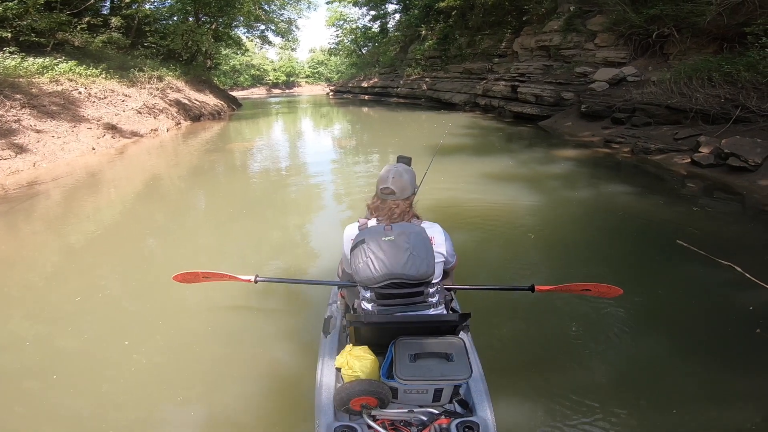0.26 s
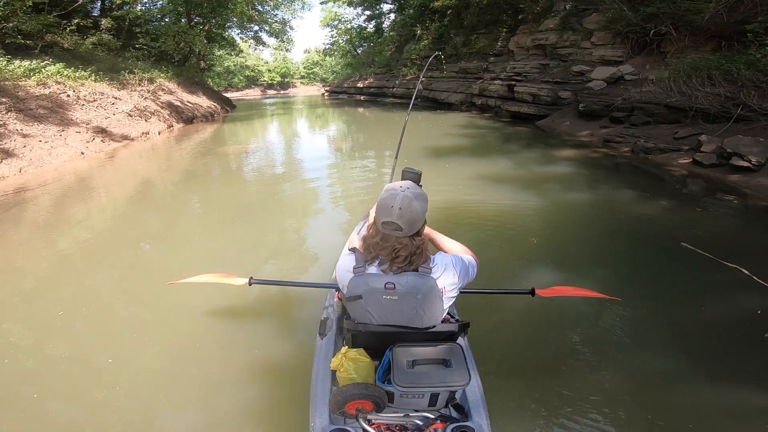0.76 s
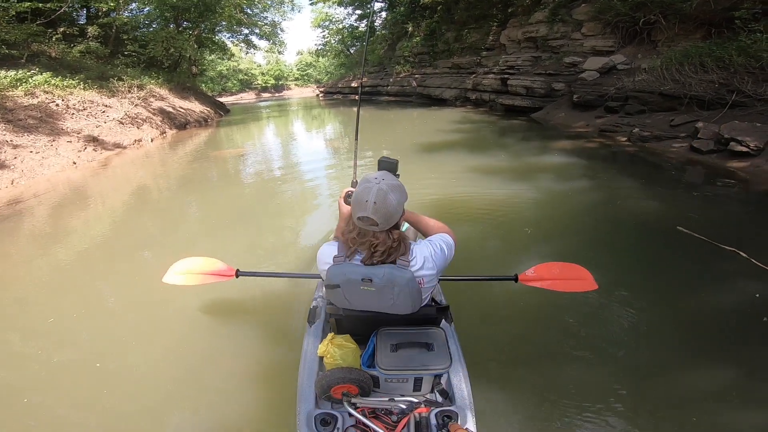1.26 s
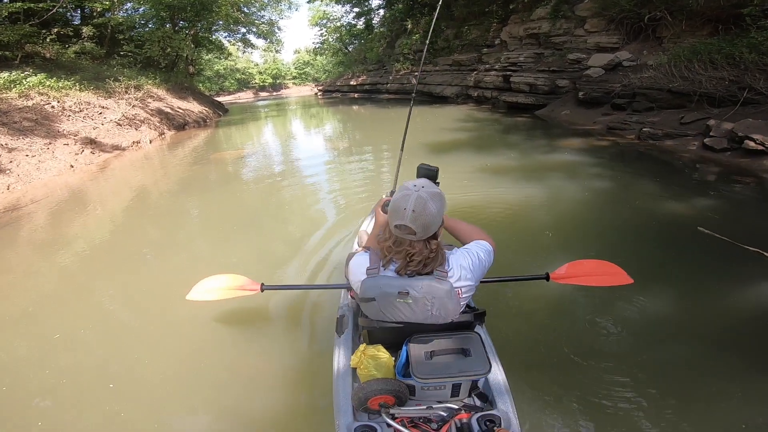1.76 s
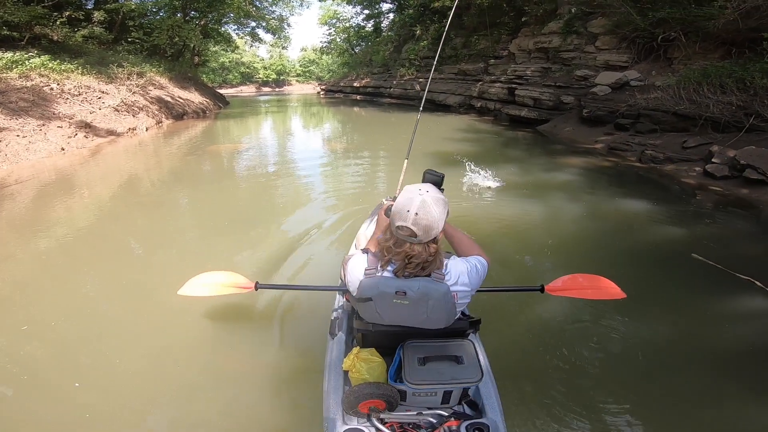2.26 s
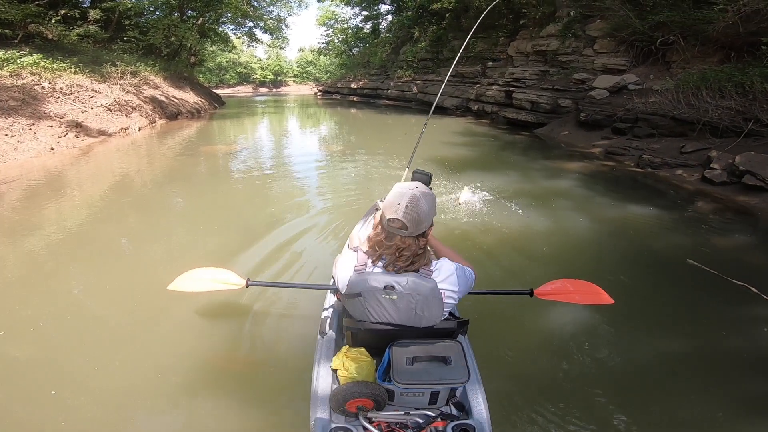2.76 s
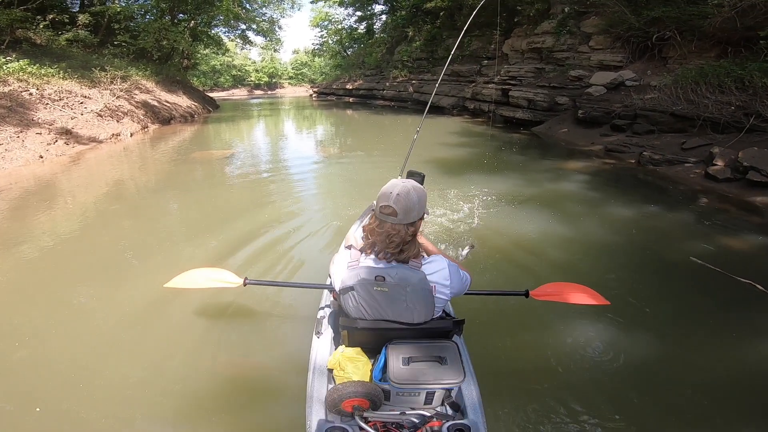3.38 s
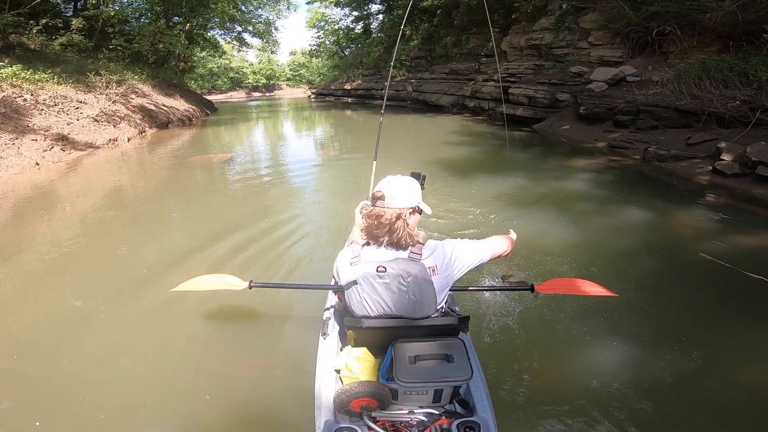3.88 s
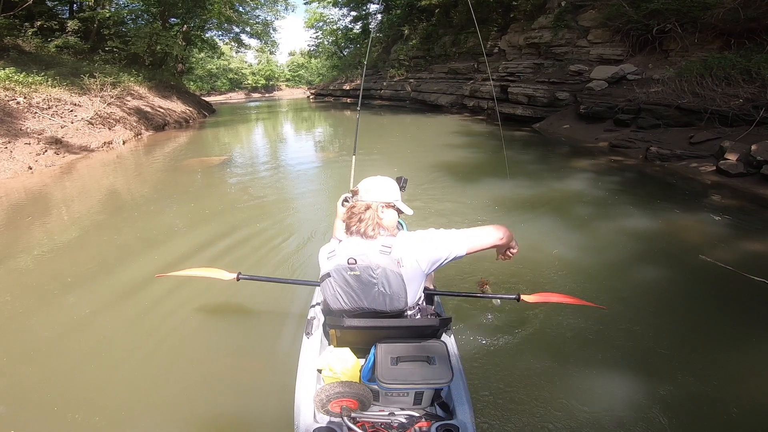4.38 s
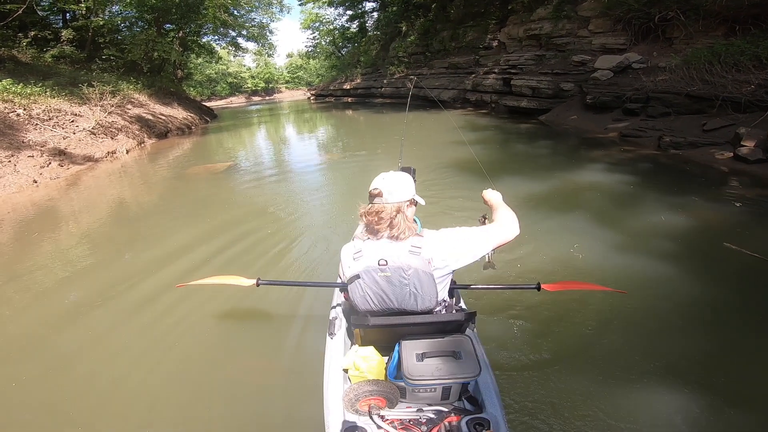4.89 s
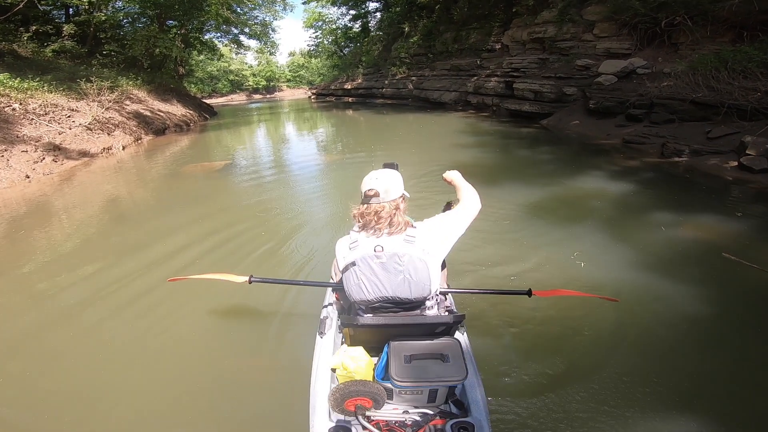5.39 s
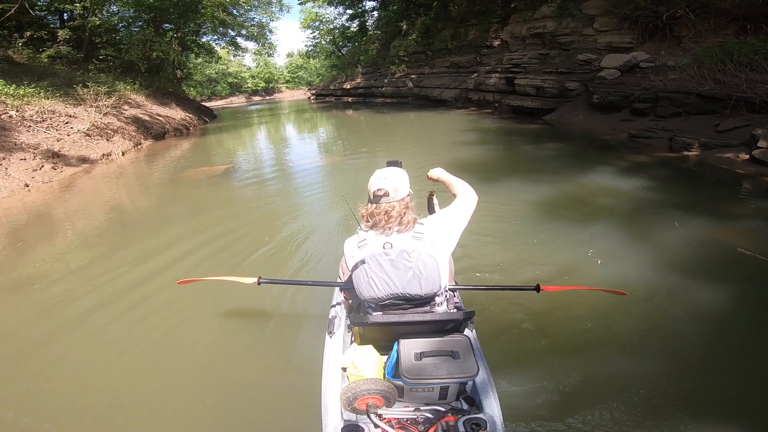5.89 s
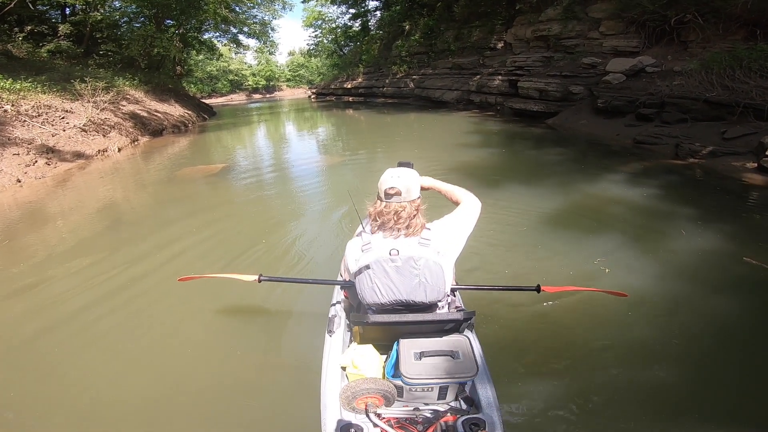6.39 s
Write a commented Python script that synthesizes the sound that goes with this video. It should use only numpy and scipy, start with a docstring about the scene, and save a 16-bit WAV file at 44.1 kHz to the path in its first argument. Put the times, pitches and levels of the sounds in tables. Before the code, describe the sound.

A microphone on a pole fixed to a kayak hears mainly low, uneven rumble, pole shudder and dull padded bumps, over very faint hiss of creek and trees. Small knocks lead to a hard, loud clack at 0.8 s with rough dragging and a tiny swish near 0.95 s. Another knock comes at 1.8 s. From 2.1 s a small fish thrashes: light wet slaps, bubbles and fine spray in bursts, with crisp clicks. Around 3.15 s a slosh and sharp slap mark the lift; the joint chatters, bumps thicken, and drops plop between 3.4 and 3.75 s. A bright click at 3.8 s precedes rattling knocks to 4.4 s as splashing fades by 4.5 s. Knocks return at 4.9 s, then a calmer stretch with barely audible bird notes. Heavy hollow hull booms hit at 5.9 s, smaller ones to 6.2 s; a thin bird whistle rises from 6.4 s.

```python
"""On a quiet creek, a small fish is reeled in, splashing, and swung aboard a kayak.
The microphone rides on a pole fixed to the hull. Structure-borne sound comes from resonant modes of pole,
mount and hull, driven by noise for the rumble and chatter and struck for the bumps, knocks and booms.
Airborne sound is shaped noise for hiss, spray, slaps and clicks, decaying sines for bubbles and drops,
and gliding tones for thin bird whistles."""
import sys
import numpy as np
from scipy import signal
from scipy.fft import rfft, irfft, next_fast_len
from scipy.io import wavfile
from scipy.ndimage import uniform_filter1d, minimum_filter1d

SR = 44100
rng = np.random.default_rng(int(sys.argv[2]) if len(sys.argv) > 2 else 0)


def transcribe(u):
    """Save the signal u as a 16-bit wav file named by the first command-line argument.

    u: samples, shape (n,) or (channels, n), limited to [-1, 1]; the rate is SR.
    q: integer samples, one column per channel.
    """
    v = np.clip(np.atleast_2d(u).T, -1, 1)
    q = np.round(v * 32767).astype(np.int16)
    wavfile.write(sys.argv[1], SR, q)


N = 293265
TIME = np.arange(N) / SR

# Levels in the tables are relative: the functions add their own trims.
# resonances of the rocking hull, the pole and its mount: f/Hz, bandwidth/Hz, level/dB
SWAY_MODES = [(30.6, 5.1, -1), (56.6, 17.7, -2.5)]
POLE_MODES = [(126.7, 19.7, 4), (164.1, 38.9, -1.5), (206.5, 45.8, -13), (272.3, 33, -21)]
MOUNT_MODES = [(223, 2.6, 20), (279.2, 9.2, 7.5), (402, 16, 7), (520, 180, -3.5), (532, 61, -11),
               (760, 25, 6), (860, 29, 8.5), (844, 23, 7.5), (867, 34, -15.5), (1080, 40, -28)]
# slow rocking of the hull: t/s, level/dB
ROCKING = [(0.0, -37), (0.8, -24), (1.31, -32.5), (1.87, -27.5), (2.28, -37), (2.63, -27.5), (2.87, -44.5),
           (3.0, -47.5), (3.09, -31.5), (4.46, -33.5), (4.63, -50.5), (5.08, -26), (5.31, -46), (5.37, -32),
           (5.8, -47), (6.02, -24), (6.65, -39.5)]
# how hard the angler works the rod, which shakes the pole: t/s, level/dB
EFFORT = [(0, -28.5), (.4, -23.5), (.66, -21.5), (1.0, -33.5), (1.38, -37), (1.85, -26), (2.02, -31.5),
          (2.55, -27.5), (2.72, -41), (2.82, -29), (2.88, -33.5), (3.02, -37.5), (3.06, -36), (3.17, -22.5),
          (3.62, -28.5), (4.4, -29.5), (4.63, -42), (4.87, -39), (5.22, -37), (5.8, -48), (6.65, -37)]
# the angler's weight shoves against the seat: start t/s, length/s, level/dB
SHOVES = [(0.815, 0.068, -17), (3.187, 0.17, -28), (5.325, .12, -21.5), (5.866, 0.49, -18)]
SHOVE_ATTACK_S, SHOVE_RELEASE_S = 0.015, 0.022
# the mount chatters more while the fish is lifted and swung in
LIFT_S, LIFT_LENGTH_S, LIFT_CHATTER_DB = 3.14, 1, 5
# spectrum of rubbing surfaces: f/Hz, level/dB
RUB_SPECTRUM = [(200, -3), (290, 10.5), (350, -9), (410, 1.5), (500, 0), (570, -4.5), (740, 4), (890, 0),
                (1020, -13.5), (1200, -16), (1500, -18.5), (3000, -69)]
# hiss of the creek and woods, its course: t/s, level/dB
AIR_LEVEL = [(0, -59.5), (.78, -61), (1.1, -69), (2, -63.5), (4.9, -64), (5.8, -62), (6.65, -71)]
# hiss of the creek and woods, its spectrum: f/Hz, level/dB
AIR_SPECTRUM = [(100, 17.5), (400, 6.5), (900, 2), (1400, 2), (2200, 0), (3000, 1), (3700, -1),
                (4700, -4.5), (5600, -2.5), (6800, -6.5), (7900, -3), (9600, -8.5), (12500, -17),
                (15500, -27)]
# soft bumps of body and gear against the seat: t/s, thud level/dB, rub level/dB, thud f/Hz
BUMPS = [(0.058, -17.5, -56.5, 135.1), (.2, -24, -50.5, 129.8), (.323, -18, -56, 133.4),
         (.393, -13.5, -64.5, 130), (.507, -15.5, -60, 133.1), (0.569, -13, -48, 127.1),
         (0.687, -23, -62, 162), (.744, -14, -37.5, 133.3), (1.069, -24.5, -40.5, 126.3),
         (1.101, -23.5, -45, 128.3), (1.249, -25, -62.5, 143.7), (1.433, -20.5, -63, 120.4),
         (1.495, -32.5, -49.5, 189), (1.538, -23, -45.5, 129), (1.646, -19, -52.5, 140),
         (1.901, -14.5, -57, 127.6), (2.08, -15.5, -54.5, 128.1), (2.281, -21, -59, 135.6),
         (2.35, -31, -42.5, 138.3), (2.449, -19.5, -44.5, 140.8), (2.503, -20, -38.5, 128.8),
         (2.718, -24.5, -46.5, 141.3), (2.821, -24, -52.5, 157), (3.048, -21.5, -55.5, 137.6),
         (3.168, -28, -41, 161.4), (3.204, -18, -41.5, 142.2), (3.24, -22.5, -45.5, 135.5),
         (3.362, -21, -48, 158.8), (3.483, -9.5, -27.5, 138.8), (3.56, -18, -38, 143.3),
         (3.696, -18.5, -33, 164), (3.739, -16, -37.5, 141.6), (3.832, -17, -47.5, 138.5),
         (3.888, -13.5, -30.5, 150.4), (3.915, -15, -48.5, 135.6), (3.988, -22, -43.5, 156.3),
         (4.021, -24.5, -50, 134.2), (4.423, -31.5, -38, 135.5), (4.518, -23.5, -47, 155.4),
         (4.904, -11, -40.5, 171.6), (4.969, -17, -43, 166), (5.336, -24, -57.5, 127),
         (5.443, -15.5, -58, 128.7), (5.97, -15.5, -40, 173), (6.108, -15.5, -33.5, 137.2),
         (6.148, -17, -38.5, 160), (6.238, -28.5, -38, 149.4), (6.181, -10, -47, 149.1),
         (6.271, -14.5, -47, 137.6), (6.612, -24.5, -64, 130.5)]
# swelling time of a bump, decay of its rub, time scale of its thud
BUMP_SWELL_S, BUMP_RUB_S, BUMP_THUD_S = 0.0071, 0.03, 0.009
# knocks in the mount: t/s, thud level/dB, clack level/dB, sharp crack level/dB, ring time/s
KNOCKS = [(0.436, -29, -42, -59, 0.036), (0.4943, -16.5, -40, -64, 0.017), (0.619, -14, -37, -48.5, 0.028),
          (0.826, -1.5, -10, -18, 0.014), (0.875, -16.5, -24, -58.5, 0.016),
          (0.918, -20, -41.5, -54, 0.036), (1.121, -11, -33.5, -57, 0.02),
          (1.795, -9.5, -24, -38.5, 0.0067), (1.8243, -10, -38, -58, 0.015),
          (3.869, -19.5, -26, -60, 0.011), (3.981, -16, -33.5, -70, 0.027), (4.184, -27.5, -23, -50, 0.021),
          (4.1992, -11.5, -23.5, -42, 0.0096), (4.2349, -14.5, -27, -49, 0.037),
          (4.3189, -7, -15.5, -40, 0.014), (4.394, -10, -31.5, -69, 0.024), (4.8948, -8, -22.5, -58, 0.014),
          (4.967, -14, -34, -75, 0.023), (5.0154, -20, -34, -45.5, 0.018), (5.039, -22, -42.5, -69, 0.024),
          (5.86, -15, -37.5, -67, 0.032), (5.895, -11, -24.5, -31.5, 0.045),
          (5.9231, -2.5, -28, -45, 0.066), (6.03, -9, -31.5, -68, 0.023), (6.068, -25.5, -31, -82, 0.02),
          (6.226, -18.5, -41.5, -69, 0.02)]
# spectra of a knock's first contact, dull and sharp: f/Hz, level/dB
CLACK_SPECTRUM = [(150, -8), (350, 3), (570, 4.5), (680, 8.5), (860, 9.5), (1150, -24), (1500, -22),
                  (2400, -41), (5000, -99.5)]
CRACK_SPECTRUM = [(500, -33.5), (1100, 16.5), (1500, 12.5), (2200, 0.5), (3400, -16), (4500, -37),
                  (7000, -43), (12000, -70)]
CONTACT_S, RATTLE_S = .004, .032  # decay times of a knock's contact and of the rattle after it
# the parts scuff as they slide into each knock: lead time, level relative to the clack
SCUFF_S, SCUFF_UNDER_DB = 0.017, -25
# clicks of rod, reel and lure, and sharp slaps of water: t/s, level/dB, treble level/dB, left-right/dB
TICKS = [(0.8265, -46, -23, -8), (1.3764, -56.5, -7, 7), (2.151, -51.5, 1, 8), (2.328, -54.5, 8, 10),
         (2.439, -47, -6, -1), (2.484, -56.5, 7, 8), (2.577, -45.5, 0.5, 4), (2.956, -48, -21, -12),
         (3.1058, -45.5, 7, 9), (3.1607, -32, 0.5, 6.5), (3.2314, -41.5, -33, 0), (3.7879, -26.5, -8, 7),
         (3.883, -48.5, 1.5, 10), (3.908, -45, 1, 2), (4.2152, -40, -9, 8), (4.6, -42, -9.5, -8),
         (4.9353, -46.5, -11, -8), (5.891, -41.5, -30, 3.5), (5.922, -43.5, -26, -4.5),
         (5.998, -49.5, -24, -9), (6.368, -60, -4, -6)]
# spectra of a click's body and of its treble edge: f/Hz, level/dB
TICK_BODY_SPECTRUM = [(500, 0), (1300, 5), (2800, 6.5), (4200, 5), (6000, -9.5), (9000, -23.5)]
TICK_EDGE_SPECTRUM = [(3000, -1.5), (6000, 9), (8300, 8.5), (10000, -3.5), (13000, -3), (15500, -7)]
# dense rough noise, gear dragging after knocks and a slosh of water at 3.16 s:
# start t/s, length/s, level/dB, change over the length/dB
ROUGH_NOISES = [(0.845, 0.085, -22.5, -14.5), (1.814, 0.044, -38, -20.5), (3.164, 0.16, -37, -6),
                (4.214, 0.09, -38.5, -14), (4.347, 0.096, -35, -14.5), (4.908, 0.067, -41, -6.5)]
# spectrum of the rough noise: f/Hz, level/dB
ROUGH_SPECTRUM = [(200, 4), (400, 6.5), (640, 2), (780, -4.5), (870, -6), (1050, -19.5), (1210, -15.5),
                  (1360, -11.5), (1500, -30), (1780, -16), (2500, -51), (5000, -69)]
# a short swish as the rod is swept up
SWISH_S, SWISH_LENGTH_S, SWISH_ATTACK_S, SWISH_RELEASE_S, SWISH_DB = 0.95, 0.04, 0.018, 0.014, -62
# spectrum of the swish: f/Hz, level/dB
SWISH_SPECTRUM = [(800, -16.5), (2000, 3), (3000, 3.5), (4200, -1.5), (5000, -18), (9000, -34),
                  (14000, -40)]
# faint notes of a far bird: start t/s, length/s, f/Hz, fall/Hz, level/dB
FAR_NOTES = [(1.596, 0.28, 3170, 30.6, -81), (4.457, 0.42, 3190, 100, -79.5), (5.217, .3, 3200, 120, -79.5)]
# wet slaps of the fish's body and falling sheets of water: t/s, level/dB, f/Hz, decay/s
SLAPS = [(2.1, -59.5, 1200, .025), (2.142, -76, 1100, 0.0053), (2.164, -53.5, 1400, 0.035),
         (2.178, -61.5, 1700, 0.029), (2.192, -50.5, 720, 0.0092), (2.269, -56, 1440, 0.017),
         (2.327, -59, 1350, 0.0088), (2.344, -57, 1290, 0.017), (2.439, -59, 1460, 0.024),
         (2.485, -58, 2170, 0.02), (2.553, -53, 1600, 0.022), (2.81, -52.5, 1450, 0.017),
         (2.826, -60, 2200, .008), (2.986, -63, 1480, 0.0066), (3.11, -57, 1550, 0.028),
         (3.188, -59.5, 1250, 0.0091), (3.228, -45, 765, 0.0047), (3.328, -62, 800, .008),
         (3.432, -54.5, 1350, 0.011), (3.466, -53, 880, 0.012), (3.545, -54.5, 1970, 0.029),
         (3.908, -63, 1200, 0.012), (3.969, -59, 1970, 0.014)]
# thrashes of the fish: t/s, splash level/dB, fine spray level/dB
THRASHES = [(2.13, -55.5, -60.5), (2.31, -57.5, -58), (2.538, -64.5, -62.5), (2.79, -66, -68.5),
            (2.927, -65, -58.5), (3.129, -54.5, -55), (3.469, -58, -67), (3.764, -61, -59.5),
            (4.191, -60, -65)]
THRASH_ATTACK_S, THRASH_HOLD_S, THRASH_SETTLE_S = 0.02, 0.0056, 0.48
WATER_CALM_S = 4.5  # time at which the splashing has faded out
# spectra of churned water and of fine spray: f/Hz, level/dB
WATER_SPECTRUM = [(300, -12.5), (700, -5.5), (1400, -15.5), (2400, -11.5), (3600, -16.5), (5000, -25.5),
                  (7000, -58), (15000, -34)]
SPRAY_SPECTRUM = [(3000, 4), (5200, -5.5), (8200, 0), (9600, -6.5), (12500, -10), (15500, -10.5)]
# drops that trap a bubble: t/s, level/dB, f/Hz
PLOPS = [(2.957, -39.5, 1730), (3.383, -45, 1850), (3.43, -47.5, 2000), (3.5366, -36, 1590),
         (3.5943, -42.5, 1740), (3.6, -39, 1970), (3.628, -46, 2330), (3.734, -44, 1780),
         (3.747, -44, 1680)]
# heavy blows on the hull: t/s, level/dB, decay/s, f/Hz favoured by the place of the blow, favour/dB
BOOMS = [(5.894, -12, 0.028, 988, 11), (5.924, -12, 0.038, 413, -1.5), (6.03, -25.5, 0.065, 696, 9),
         (6.222, -34, 0.05, 696, 14)]
# the hollow hull's modes: f/Hz, width/Hz (the rate at which the mode wavers), level/dB
HULL_MODES = [(235, 42, -5), (284.4, 11, -2), (395, 21, -5.5), (419, 11, -3.5), (476, 43, -11.5),
              (565, 13, -8), (652, 23, -14.5), (688, 25, -12), (742, 30, -8.5), (833, 12, -13.5),
              (895, 18, -7.5), (955, 15, -12.5), (1110, 25, -23.5), (1196, 15, -19), (1254, 20, -24.5),
              (1620, 20, -35)]
BOOM_ATTACK_S, BOOM_FAVOUR_OCTAVES = 0.0026, 0.14
# a thin rising bird whistle: start, first pitch, climb, swelling time, level
WHISTLE_S, BIRD_HZ, BIRD_CLIMB_HZ_PER_S, BIRD_SWELL_S, BIRD_DB = 6.42, 6850, 2400, .23, -71
# vibration at the left port against the right: f/Hz, level/dB, lag/rad
LEFT_PORT = [(25, -14, 1.7), (55, -17, 2), (90, -14, 2.3), (130, -22, 2.8), (200, -16, 3.3),
             (280, -11, 3.8), (400, -5, 3.6), (560, -2.5, 3.45), (950, -.5, 3.55), (2000, -3, 3.9),
             (5000, -2, 5.5)]
# airborne sound at the two ports: f/Hz, left-right/dB, likeness (0-1), phase lead of the left/rad
AIR_PORTS = [(300, -3, .8, .2), (1300, -3, .8, 1), (2300, -2.5, .8, .9), (4400, -1.5, .75, 0),
             (6000, 2, .7, -.3), (8100, 4, .65, -1.4), (15000, 1.5, .5, -2.5)]
EDGE_HZ = 15700  # upper band limit


def amp(db):
    """Level law: decibels to an amplitude ratio."""
    return 10 ** (np.asarray(db) / 20)


def unit(x):
    """Normalisation to an rms value of 1."""
    return x / np.sqrt(np.mean(x ** 2) + 1e-20)


def across(table, hz, axis=1):
    """Interpolation of one table column over logarithmic frequency."""
    table = np.array(table, float)
    return np.interp(np.log(hz + 1), np.log(table[:, 0] + 1), table[:, axis])


def along(table, axis=1):
    """Linear interpolation of one table column over time."""
    table = np.array(table, float)
    return np.interp(TIME, table[:, 0], table[:, axis])


def add(mix, s, sound):
    """Superposition: a sound is added to the mix from time s."""
    part = mix[..., max(round(s * SR), 0):][..., :sound.shape[-1]]
    part += sound[..., :part.shape[-1]]


def filtered(x, response):
    """Linear filtering: the spectrum is multiplied by a complex gain, a function of frequency."""
    size = next_fast_len(len(x) + 4096, True)
    return irfft(rfft(x, size) * response(np.fft.rfftfreq(size, 1 / SR)), size)[:len(x)]


def colour(x, spectrum, size=2048):
    """Minimum-phase filter: the phase follows from the log gain by the Hilbert transform."""
    log_gain = np.log(amp(across(spectrum, abs(np.fft.fftfreq(size, 1 / SR)))))
    taps = np.fft.ifft(np.exp(signal.hilbert(log_gain).conj())).real[:size // 2]
    return signal.oaconvolve(x, taps)[:len(x)]


def peaked(x, size):
    """Scaling by short-time energy: the loudest stretch of size samples has rms 1."""
    return x / np.sqrt(uniform_filter1d(x ** 2, size, mode="constant").max() + 1e-20)


def steadied(x, size):
    """Division by the running rms, which evens out slow chance swells."""
    power = uniform_filter1d(uniform_filter1d(x ** 2, size), size)
    return x / np.sqrt(abs(power) + 1e-9)


def burst(start, length, attack_s, release_s):
    """Envelope: linear rise, hold to the end of the length, exponential decay."""
    age = TIME - start
    return np.clip(age / attack_s, 0, 1) * np.exp(-np.maximum(age - length, 0) / release_s)


def wander(rate_hz):
    """Low-pass random process: a drift of rms 1 with Gaussian spectrum."""
    t = np.arange(0, N / SR + 1, 1 / 500)
    smoothing = np.exp(-(np.fft.rfftfreq(len(t), t[1]) / rate_hz) ** 2)
    drift = irfft(rfft(rng.standard_normal(len(t))) * smoothing, len(t))
    return np.interp(TIME, t, unit(drift))


def patter(per_s, spread_db):
    """Shot noise: random impacts of uneven size and either sign."""
    size = amp(spread_db * np.minimum(rng.exponential(1, N), 4))
    return unit(size * rng.choice([-1., 1.], N) * (rng.random(N) < per_s / SR))


def surging(x, depth_db, rate_hz, count=6):
    """Independent band modulation: each band of a sound swells and sinks on its own."""
    def share(f, k):
        place = np.clip(np.log2((f + 1) / 700) * 1.4, 0, count - 1)
        return np.maximum(1 - abs(place - k), 0)
    return unit(sum(filtered(x, lambda f: share(f, k)) * amp(depth_db * wander(rate_hz))
                    for k in range(count)))


def ring(modes, t):
    """Free vibration: each mode decays at a rate proportional to its bandwidth."""
    return sum(amp(db) * width * np.exp(-np.pi * width * t) * np.sin(2 * np.pi * hz * t)
               for hz, width, db in modes)


def shaken(modes, drive):
    """Forced vibration: modes under a continuous force, neighbours moving in opposite senses."""
    def response(f):
        total = 0
        for k, (hz, width, db) in enumerate(modes):
            resonance = width * hz / (hz ** 2 - f ** 2 + 1j * width * f)
            skirts = f / np.hypot(f, hz / 2) / np.hypot(1, (f / (2 * hz)) ** 2)
            total = total + (-1) ** k * amp(db) * resonance * skirts
        return total
    return unit(filtered(drive, response))


def sway(level_db=7):
    """Low-frequency resonance: the hull rocks and the pole swings with it."""
    return steadied(shaken(SWAY_MODES, rng.standard_normal(N)), size=4000) * amp(along(ROCKING) + level_db)


def shaking(uneven_db=3.0):
    """Energy summation: effort and shoves together set the drive on the pole, in dB."""
    shoves = sum(amp(db) * burst(s, length, SHOVE_ATTACK_S, SHOVE_RELEASE_S) for s, length, db in SHOVES)
    effort = amp(along(EFFORT) + uneven_db * wander(rate_hz=44))
    return 20 * np.log10(np.hypot(effort, shoves))


def pole_shudder(shake_db, level_db=1.5):
    """Forced vibration of the pole in its own modes."""
    return steadied(shaken(POLE_MODES, rng.standard_normal(N)), size=1600) * amp(shake_db + level_db)


def chatter(level_db=-54, reference_db=-28, follow=0.95, uneven_db=3, groan_db=-3, rest_db=-65, soft_hz=1250):
    """Intermittent contact: the pole's joint chatters and groans with effort, over a steady murmur."""
    lift_db = LIFT_CHATTER_DB * burst(LIFT_S, LIFT_LENGTH_S, SHOVE_ATTACK_S, SHOVE_RELEASE_S)
    effort_db = follow * (along(EFFORT) - reference_db)
    groan = shaken(MOUNT_MODES[1:4], rng.standard_normal(N))
    rattle = unit(colour(patter(per_s=470, spread_db=4.5), RUB_SPECTRUM)) + amp(groan_db) * groan
    rattle = filtered(rattle, lambda f: 1 / np.hypot(1, (f / soft_hz) ** 4))
    murmur = amp(rest_db) * unit(colour(rng.standard_normal(N), RUB_SPECTRUM))
    return rattle * amp(level_db + lift_db + effort_db + uneven_db * wander(rate_hz=37)) + murmur


def woods():
    """Broadband noise: the soft hiss of leaves and water."""
    return unit(colour(rng.standard_normal(N), AIR_SPECTRUM)) * amp(along(AIR_LEVEL))


def bumps(thud_db=0, rub_db=-1, waver=0.059, overtone=2, overtone_db=-26):
    """Damped oscillation: a padded push swings the pole at a pitch set by joint load; surfaces rub."""
    t, out = np.arange(SR // 4) / SR - .04, np.zeros(N)
    rub_shape = np.exp(np.minimum(t, 0) / BUMP_SWELL_S) * np.exp(-np.maximum(t, 0) / BUMP_RUB_S)
    age = np.maximum(t / BUMP_THUD_S + 1, 0)
    for s, thud_level, rub_level, hz in BUMPS:
        phase = 2 * np.pi * np.cumsum(hz * (1 + waver * wander(rate_hz=40)[:len(t)])) / SR
        swing = np.sin(phase) + amp(overtone_db) * np.sin(overtone * phase)
        thud = peaked(swing * age ** 2 * np.exp(-age), size=400)
        rub = peaked(colour(rng.standard_normal(len(t)) * rub_shape, RUB_SPECTRUM), size=400)
        add(out, s + t[0], amp(thud_level + thud_db) * thud + amp(rub_level + rub_db) * rub)
    return out


def scuffs():
    """Sliding friction: a short scrape swells up to each knock."""
    level = sum(amp(clack_db + SCUFF_UNDER_DB) * np.exp(-abs(TIME - s) / SCUFF_S) * (TIME < s)
                for s, _, clack_db, _, _ in KNOCKS)
    return level * shaken(MOUNT_MODES[2:], rng.standard_normal(N))


def knocks(thud_ring=4.2, ring_db=-4, clack_trim_db=-1, rattle_db=-18, crack_s=0.0046, scrape=1.0,
           soft_hz=1380, thud_trim_db=-1.5):
    """Impact excitation: play in the mount closes with crack and clack, rattles, and rings the pole."""
    t, out = np.arange(SR // 2) / SR, np.zeros(N)
    # a sharp blow favours the upper modes
    pole = ring([(hz, width, db + 9 * np.log2(hz / POLE_MODES[0][0])) for hz, width, db in POLE_MODES], t)
    mount = ring(MOUNT_MODES, t)
    # the plastic hull passes little treble
    cushion = signal.butter(8, soft_hz, fs=SR, output="sos")
    contact_shape = np.exp(-t / CONTACT_S) + amp(rattle_db) * np.exp(-t / RATTLE_S)
    for s, thud_db, clack_db, crack_db, ring_s in KNOCKS:
        clack_noise, rub_noise, crack_noise = rng.standard_normal((3, len(t)))
        thud = peaked(pole * np.exp(-t / (thud_ring * ring_s)) * (1 - np.exp(-t / 0.0092)), size=200)
        clack = peaked(colour(clack_noise * contact_shape, CLACK_SPECTRUM), size=130)
        # the blow itself and the scraping after it both feed the mount's modes
        rub = rub_noise * np.exp(-2 * t / ring_s)
        rubbed = signal.fftconvolve(rub / np.linalg.norm(rub), mount)[:len(t)]
        tone = peaked((mount + scrape * rubbed) * np.exp(-t / ring_s), size=260)
        crack = peaked(colour(crack_noise * np.exp(-t / crack_s), CRACK_SPECTRUM), size=90)
        # a freely ringing blow puts more into the modes and less into the contact
        hollow = (ring_s / .025) ** .4
        body = amp(thud_db + thud_trim_db) * thud + amp(clack_db + ring_db) * hollow * tone
        body = signal.sosfilt(cushion, body)
        add(out, s, body + amp(clack_db + clack_trim_db) * clack / hollow + amp(crack_db) * crack)
    return out


def ticks(decay_s=0.0012, tail_db=-27, tail_s=0.011, body_db=-8, edge_db=-6):
    """Transient noise: short dry clicks with a brief scatter, placed by level difference."""
    t, out = np.arange(4000) / SR, np.zeros((2, N))
    decay = np.exp(-t / decay_s) + amp(tail_db) * np.exp(-t / tail_s)
    shape = decay * (1 - np.exp(-t / 0.0013))
    for s, db, treble_db, pan_db in TICKS:
        body_noise, edge_noise = rng.standard_normal((2, len(t))) * shape
        body = peaked(colour(body_noise, TICK_BODY_SPECTRUM), size=90)
        edge = peaked(colour(edge_noise, TICK_EDGE_SPECTRUM), size=90)
        click = amp(db) * (amp(body_db) * body + amp(treble_db + edge_db) * edge)
        add(out, s, amp(np.clip(pan_db, -10, 10) * np.array([[.5], [-.5]])) * click)
    return out


def rough_noises(attack_s=0.0053, release_s=0.0043):
    """Modulated noise: dense and rough, fading over its length, for dragging gear and a slosh of water."""
    level = np.zeros(N)
    for s, length, db, fade_db in ROUGH_NOISES:
        fading_db = db + fade_db * np.clip((TIME - s) / length, 0, 1)
        level += amp(fading_db) * burst(s, length, attack_s, release_s)
    rough = unit(amp(5 * wander(rate_hz=110))) * rng.standard_normal(N)
    return level * steadied(colour(rough, ROUGH_SPECTRUM), size=1400)


def swish():
    """Aerodynamic noise: rod and line cut the air."""
    envelope = burst(SWISH_S, SWISH_LENGTH_S, SWISH_ATTACK_S, SWISH_RELEASE_S)
    return unit(colour(rng.standard_normal(N), SWISH_SPECTRUM)) * amp(SWISH_DB) * envelope


def far_bird(blur_hz=100, edge_s=.05):
    """Scattering: gently falling whistles, blurred by the trees into narrow-band noise."""
    out = np.zeros(N)
    for s, length, hz, fall_hz, db in FAR_NOTES:
        pitch = hz - fall_hz * np.clip((TIME - s) / length, 0, 1)
        blur = wander(blur_hz) + 1j * wander(blur_hz)
        note = (blur * np.exp(2j * np.pi * np.cumsum(pitch) / SR)).real
        out += amp(db) * note * burst(s, length, edge_s, edge_s / 2)
    return out


def slaps(level_db=1, attack_s=0.00044, octaves=0.35):
    """Cavity closure: water shuts on a pocket of air, a short gulp of noise around one pitch."""
    t, out = np.arange(4000) / SR, np.zeros(N)
    for s, db, hz, decay_s in SLAPS:
        noise = rng.standard_normal(len(t)) * np.exp(-t / decay_s) * (1 - np.exp(-t / attack_s))
        gulp = filtered(noise, lambda f: 1 / (1 + (np.log2((f + 1) / hz) / octaves) ** 2))
        add(out, s, amp(db + level_db) * peaked(gulp, size=200))
    return out


def bubble(hz, cycles, rise, size=2000):
    """Bubble resonance: trapped air rings and rises in pitch as it nears the surface."""
    age = np.arange(size) / SR * hz / cycles
    return np.sin(2 * np.pi * cycles * (age + rise * age ** 2)) * np.exp(-age) * (1 - np.exp(-6 * age))


def droplets(level_db=-3, spread_db=2.5, count=14):
    """Random superposition: drops of many sizes fall back, each a ping of a few cycles."""
    pings = np.zeros(N)
    for hz in np.geomspace(1000, 5500, count):
        ping = bubble(hz, cycles=2.2, rise=0.05, size=700)
        pings += signal.oaconvolve(patter(per_s=8.5, spread_db=spread_db), ping)[:N]
    return amp(level_db) * unit(pings)


def splash(water_db=-4.5, spray_db=0, bubbles_db=-6, wash=1.0, surge_db=2.5, bubble_spread_db=20):
    """Turbulent agitation: each thrash churns up uneven surges of drops, small bubbles and fine spray."""
    start, end = THRASHES[0][0], WATER_CALM_S
    gate = np.clip((end - TIME) / 0.18, 0, 1)
    churn = np.array([burst(s, THRASH_HOLD_S, THRASH_ATTACK_S, THRASH_SETTLE_S) for s, _, _ in THRASHES])
    # the energies of overlapping thrashes add
    water_level, spray_level = np.sqrt(amp(np.array(THRASHES)[:, 1:]).T ** 2 @ churn ** 2)
    surge = amp(surge_db * wander(rate_hz=8))
    drops = colour(patter(per_s=260, spread_db=3.5) + .45 * rng.standard_normal(N), WATER_SPECTRUM)
    drops = surging(drops, depth_db=4, rate_hz=36)
    fizz = patter(per_s=520, spread_db=2.5) + wash * rng.standard_normal(N)
    fizz = unit(colour(fizz, SPRAY_SPECTRUM))
    bubbles = np.zeros(N)
    for when, pitch, size in rng.random((700, 3)):
        ringing = bubble(620 * 5.5 ** pitch, cycles=16, rise=0.021)
        add(bubbles, start + when * (end - start), amp(bubble_spread_db * size ** 2) * ringing)
    # rms of about 1 within the splashing alone
    bubbles = unit(bubbles) * np.sqrt((end - start) * SR / N)
    water = amp(water_db) * water_level * (drops + droplets() + amp(bubbles_db) * bubbles)
    return gate * surge * (water + amp(spray_db) * spray_level * fizz)


def plops(level_db=4, slap=0.15, slap_s=0.0038):
    """Bubble entrainment: large drops fall from the lifted fish, each a wet slap and a ringing bubble."""
    t, out = np.arange(2000) / SR, np.zeros(N)
    for s, db, hz in PLOPS:
        wet = unit(colour(rng.standard_normal(len(t)), WATER_SPECTRUM)) * np.exp(-t / slap_s)
        ringing = bubble(hz, cycles=4.4, rise=0.031, size=len(t))
        add(out, s, amp(db + level_db) * (ringing + slap * wet))
    return out


def boom(waver_db=3.5, drift=0.02, treble_damping=0.0056):
    """Modal ringing: heavy blows sound the hollow hull; modes waver as weight settles against it."""
    t, out = np.arange(SR // 2) / SR, np.zeros(N)
    hz, width, mode_db = np.transpose(HULL_MODES)
    for s, db, decay_s, favoured_hz, favour_db in BOOMS:
        nearness = np.exp(-(np.log2(hz / favoured_hz) / BOOM_FAVOUR_OCTAVES) ** 2)
        gains = amp(mode_db + favour_db * nearness)
        ringing = np.zeros(len(t))
        for f, w, gain in zip(hz, width, gains / np.linalg.norm(gains)):
            pitch = f * (1 + drift * wander(w)[:len(t)])
            level = gain * np.exp(-t * treble_damping * f) * amp(waver_db * wander(w)[:len(t)])
            ringing += level * np.sin(2 * np.pi * (np.cumsum(pitch) / SR + rng.random()))
        envelope = np.minimum(t / BOOM_ATTACK_S, 1) * np.exp(-t / decay_s)
        add(out, s, np.sqrt(2) * amp(db) * ringing * envelope)
    return out


def bird(waver=.009):
    """Frequency modulation: one thin, slightly wavering whistle climbs as it swells."""
    age = np.maximum(TIME - WHISTLE_S, 0)
    unsteady = 1 + waver * unit(uniform_filter1d(rng.standard_normal(N), 200))
    hz = (BIRD_HZ + BIRD_CLIMB_HZ_PER_S * age) * unsteady
    return amp(BIRD_DB) * np.minimum(age / BIRD_SWELL_S, 1) * np.sin(2 * np.pi * np.cumsum(hz) / SR)


def through_mount(x):
    """Structure-borne transfer: the ports move almost in opposition, the right far more in the bass."""
    def transfer(f):
        return amp(across(LEFT_PORT, f, axis=1)) * np.exp(-1j * across(LEFT_PORT, f, axis=2))
    return np.array([filtered(x, transfer), x])


def through_air(direct, diffuse):
    """Partial coherence: airborne sound is partly alike at the ports, shifted and shaded by the housing."""
    def same(f):
        return np.clip(across(AIR_PORTS, f, axis=2), 0, 1)
    alike = filtered(direct, lambda f: same(f) * np.exp(1j * across(AIR_PORTS, f, axis=3)))
    left = alike + filtered(diffuse, lambda f: np.sqrt(1 - same(f) ** 2))
    return np.array([filtered(left, lambda f: amp(across(AIR_PORTS, f) / 2)),
                     filtered(direct, lambda f: amp(-across(AIR_PORTS, f) / 2))])


def scene(twist_db=-20, pole_twist_db=-28):
    """Superposition of sound carried by the mount with everything that arrives through the air."""
    shake_db = shaking()
    rumble = sway() + pole_shudder(shake_db) + chatter()
    mount = through_mount(rumble + bumps() + scuffs() + knocks() + rough_noises() + boom())
    # sideways twisting reaches the left port alone
    twisting = amp(twist_db) * sway() + amp(pole_twist_db) * pole_shudder(shake_db)
    twist = np.array([[1], [0]]) * twisting
    direct = woods() + swish() + far_bird() + slaps() + splash() + plops() + bird()
    airborne = through_air(direct, diffuse=splash() + woods())
    return mount + twist + airborne + ticks()


def record(dry):
    """Peak limiting: a smoothed common gain holds the hardest knocks; a low-pass then limits the band."""
    gain = np.minimum(1, .78 / (abs(dry).max(0) + 1e-9))
    gain = minimum_filter1d(gain, size=441)
    gain = uniform_filter1d(uniform_filter1d(gain, size=221), size=221)
    low_pass = signal.firwin(511, EDGE_HZ, window=("kaiser", 9), fs=SR)
    return signal.oaconvolve(dry * gain, low_pass[None], "same")


dry = scene()
out = record(dry)
transcribe(out)
```